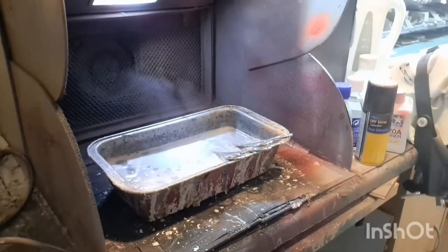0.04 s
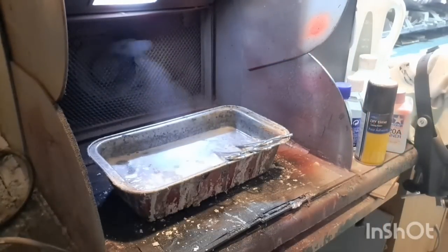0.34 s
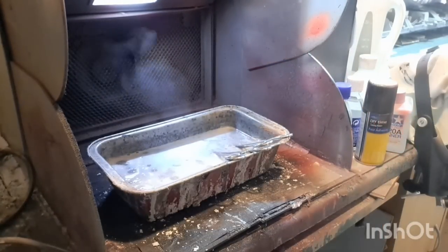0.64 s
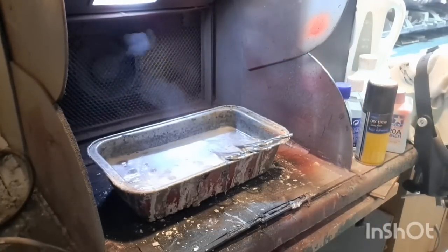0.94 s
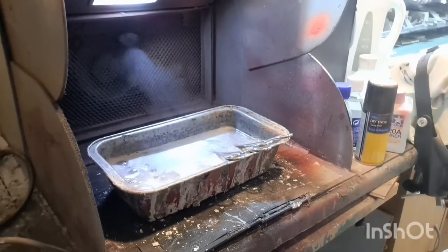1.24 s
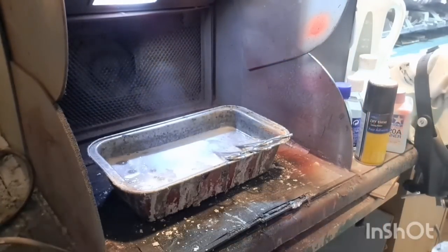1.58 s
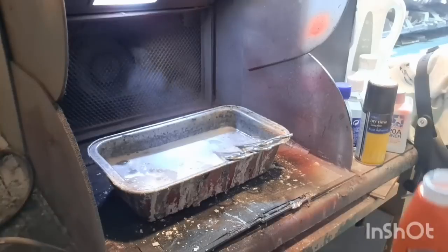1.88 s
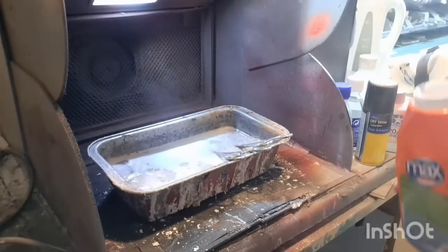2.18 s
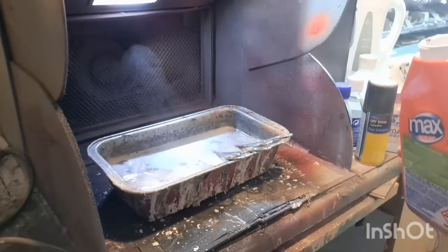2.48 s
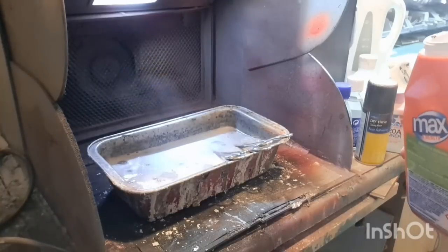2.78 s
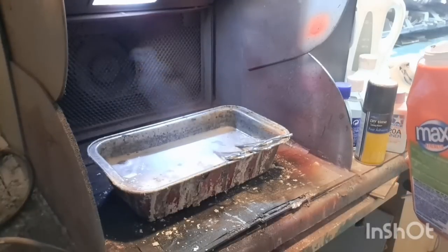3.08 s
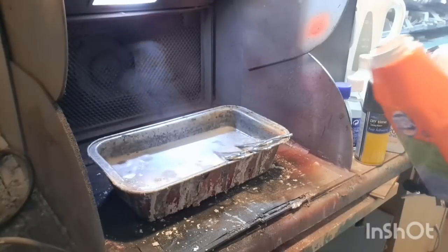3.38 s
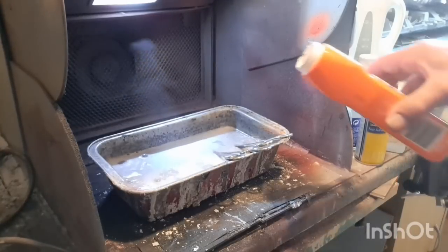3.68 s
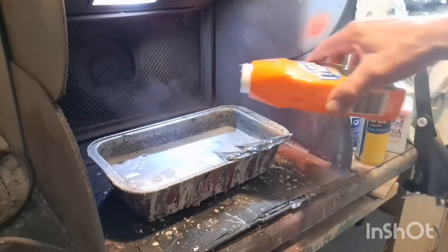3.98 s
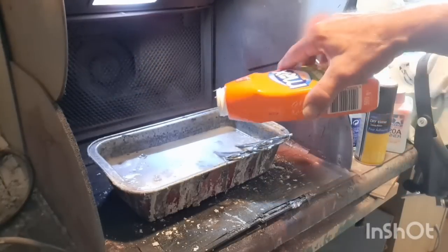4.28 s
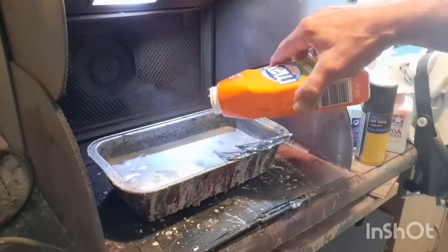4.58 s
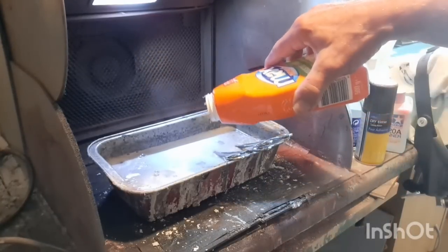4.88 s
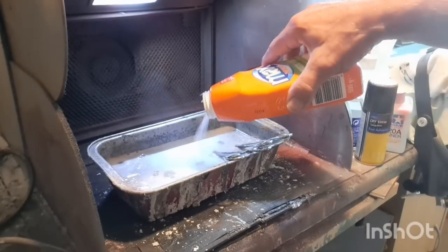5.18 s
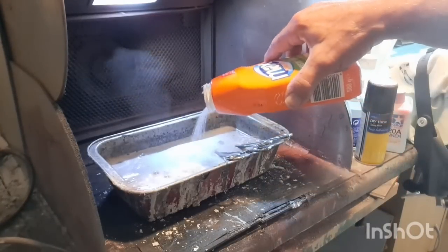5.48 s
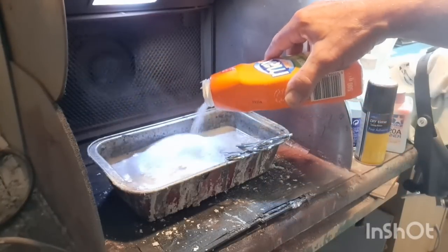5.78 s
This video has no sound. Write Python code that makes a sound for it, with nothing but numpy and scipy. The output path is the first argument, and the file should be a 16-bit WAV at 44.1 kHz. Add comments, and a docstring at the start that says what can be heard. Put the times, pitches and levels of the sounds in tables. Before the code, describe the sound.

An extractor fan runs close by in a small workshop booth for the whole six seconds. Its steady, slightly throbbing low hum rests on an even, booming rush of air. Above that are a light electric motor buzz, a fluttering hiss and a very high, thin whine. From about 2 seconds the tone shifts subtly: the whine softens a little, more on the left, and a hollow note in the airflow gradually becomes lower and stronger. At around 4.5 seconds, powder slides inside a bottle with a faint, brief, high swish. From about 5.2 seconds it trickles into a foil tray, making a soft, grainy hiss that builds until nearly 6 seconds and lasts to the end. The air's boom swells slightly around 5.5 seconds, and the fan remains the main sound throughout.

```python
"""A steady hum on a booming rush of air: the extractor fan of a small workshop booth.
Its seven-blade rotor, turning 65 times a second, radiates a harmonic series, and the turbulent flow
excites the booth's resonances. The motor buzzes at twice the mains frequency, with a fluttering hiss
and a very high whine. An arm reaches in with a bottle and screens the treble; near the end,
powder slides from the bottle and trickles softly into a foil tray."""
import sys
import numpy as np
from scipy import signal
from scipy.fft import rfft, irfft
from scipy.io import wavfile

SR = 44100
rng = np.random.default_rng(int(sys.argv[2]) if len(sys.argv) > 2 else 0)


def output_pcm(signal):
    """Save a mono or channel-first signal as 16-bit PCM at the path in sys.argv[1].

    Samples are clipped to [-1, 1] before scaling.
    """
    pcm = np.clip(np.atleast_2d(signal).T, -1, 1) * 32767
    wavfile.write(sys.argv[1], SR, np.round(pcm).astype(np.int16))


N = 266364
TIME, FREQ = np.arange(N) / SR, np.fft.rfftfreq(N, 1 / SR)
ROTOR_HZ, BUZZ_HZ, WHINE_HZ = 64.755, 100.04, 15696

# Levels precede the gains in the functions; a density is the level in a 1 Hz band. L, R: left, right.
# Coherence of the two channels: f/Hz, coherence/1
COHERENCE = [(60, 0.57), (150, 0.88), (260, 1), (400, 0.99), (520, 0.96), (700, 0.33), (1000, 0.87),
             (1800, 0.52), (2600, 0.049), (5000, 0.36), (15000, 0.057)]
# Phase lead of the left channel: f/Hz, phase/rad
PHASE_LEAD = [(60, .08), (300, -.06), (453, -.68), (600, -1.1), (830, .4), (1130, -.9), (1360, .6),
              (1600, 0), (2100, .9), (2400, 2.4), (3200, 1.2), (3800, 2.8), (6000, 3.4), (15000, 8)]
# Advance of the arm across the opening: t/s, fraction of full reach/1
ARM_REACH = [(0, 0), (2.1, .05), (3, .3), (4, .65), (5, .85), (6.04, 1.0)]
# Air rushing through the filter mesh: f/Hz, L density/dB, R density/dB
MESH_SPECTRUM = [(20, -98, -97), (45, -87, -85), (95, -90, -89), (160, -93, -94), (350, -82, -86),
                 (480, -84.5, -90), (560, -85, -85.5), (610, -88, -88), (780, -93.5, -91), (900, -91, -92),
                 (990, -91, -95), (1060, -86.5, -89.5), (1150, -91, -89.5), (1250, -92.5, -89.5),
                 (1380, -89, -89), (1480, -91.5, -93), (1650, -89.8, -88), (1900, -88.5, -86.5),
                 (2280, -92.5, -92.5), (2550, -89.5, -89.7), (2800, -91.5, -92), (3080, -95.5, -94.5),
                 (3370, -96.5, -94.5), (3600, -94, -89), (3920, -96, -91.5), (4300, -94, -90.5),
                 (4750, -94.5, -91.5), (5250, -91.7, -88.5), (6100, -94, -89.3), (7600, -92.5, -88),
                 (8850, -94, -92), (15000, -92, -90)]
# Resonances of booth and housing, driven by the air: f/Hz, width/Hz, L density/dB, R density/dB
BOOTH_MODES = [(197, 14, -73.3, -74.8), (232, 30, -73, -73), (264, 25, -63, -63.5), (299, 30, -65.3, -65.3),
               (386, 30, -73.5, -72), (660, 40, -88, -85), (1290, 110, -100, -84.5), (1395, 35, -90, -82.5),
               (3200, 50, -94, -90.5)]
# Low resonance of the duct: f/Hz, width/Hz, L density/dB, R density/dB
DUCT_MODE = [(125.8, 15, -75.5, -72.5)]
# Rise and fall of the duct's note: t/s, gain/dB
DUCT_GAIN = [(0, 2.5), (.9, 2), (1.4, -.7), (1.8, .5), (2.2, 4.5), (2.7, -1), (3.4, -2.2), (4.2, -7),
             (4.6, 2), (5.2, -3), (6.04, 4)]
# Resonances of the booth's opening: f/Hz, width/Hz, L density/dB, R density/dB
OPENING_MODES = [(720, 53, -96, -79.5), (765, 136, -104, -88)]
# Powder sliding in the bottle: f/Hz, width/Hz, L density/dB, R density/dB
SLIDE_BANDS = [(8300, 600, -92, -84), (9300, 600, -94, -89)]
# Grains landing in the tray: f/Hz, L relative level/dB, R relative level/dB
GRAIN_SPECTRUM = [(300, -12, -12), (600, -2, -2), (880, 1, 2), (1300, 2, 1), (1750, 1, 6), (2410, 0, 2),
                  (3300, -13, -13), (4100, 0, 0.5), (6000, -6, -2), (9000, -9, -4), (15000, -19, -15)]
# Envelope of the buzz's rasping upper bands: f/Hz, L level/dB, R level/dB
RASP_SPECTRUM = [(5900, -100, -100), (8140, -82, -81), (10400, -85, -74), (12460, -68, -62),
                 (14900, -59, -55), (15500, -58, -47)]
# Hiss of the motor: f/Hz, L relative level/dB, R relative level/dB
HISS_SPECTRUM = [(6450, -25, -19.5), (8850, -14, -16), (9450, -9.5, -10.5), (11300, -5.5, -5),
                 (12800, 1.5, 3), (14400, -1, -4), (16300, 2, 5)]
# Screening of the hiss by hand and bottle: t/s, relative level/dB
HISS_SCREENING = [(0, 0), (0.5, -0.6), (1, 0.5), (1.35, 0), (1.6, -1.5), (2.1, 0.4), (2.8, -1), (3.7, -2),
                  (4.2, -1), (4.5, 0.0), (4.8, -0.2), (5.2, -1), (6.04, 0.8)]
# High resonances of the motor's shell: f/Hz, width/Hz, L density/dB, R density/dB
SHELL_MODES = [(9804.0, 46.3, -94.0, -82.0), (10510.1, 120.8, -87.1, -83.8), (10896.0, 42.3, -87.7, -79.6),
               (11427.4, 91.8, -93.3, -75.3), (11557.0, 46.7, -77.8, -84.6), (12007.0, 94.9, -78.2, -73.0),
               (12501.5, 118.7, -76.7, -76.8), (12634.8, 88.9, -79.3, -77.5),
               (13010.6, 124.9, -79.9, -69.3), (13279.9, 105.0, -78.0, -74.3),
               (13591.0, 129.2, -78.2, -70.0), (13903.2, 100.0, -77.5, -73.4),
               (14088.0, 81.8, -85.9, -69.0), (14238.6, 102.6, -73.6, -71.0),
               (14582.9, 118.0, -79.8, -69.6), (14848.9, 167.1, -75.1, -68.2)]
# Housing resonances, driven by the hiss: f/Hz, width/Hz, L density/dB, R density/dB, full-reach gain/dB
HOUSING_MODES = [(6745, 130, -86, -89, -2), (7410, 174, -87.5, -86, -3), (7670, 110, -83.5, -76, -6),
                 (7907, 129, -97, -82.5, -3), (8389, 204, -85, -80.5, -.5)]
# Envelope of the weak buzz harmonics: f/Hz, L level/dB, R level/dB
BUZZ_ENVELOPE = [(200, -98, -94), (1800, -90, -86), (3000, -120, -98), (6300, -78, -85), (7140, -84, -74),
                 (8050, -92, -84), (9400, -106, -88), (10700, -93, -90)]
# Strong harmonics of the magnetic buzz: harmonic number, L level/dB, R level/dB
BUZZ_HARMONICS = [(14, -82, -76), (22, -77, -75), (27, -87, -74), (29, -73, -72), (31, -82, -77),
                  (32, -68, -64), (33, -80, -75), (35, -80, -71), (37, -80, -72), (43, -78, -69),
                  (46, -79, -73), (52, -85, -70), (53, -74, -71), (55, -80, -71), (62, -83, -69),
                  (63, -78, -69), (67, -76, -71), (68, -76, -73), (69, -76, -72), (73, -78, -72),
                  (77, -75, -66), (78, -86, -70), (79, -78, -70), (84, -77, -70), (85, -77, -72)]
# Sidebands of the whine: f/Hz, width/Hz, L density/dB, R density/dB
WHINE_SIDEBANDS = [(15650, 45, -70, -53), (15580, 80, -66.5, -59.5), (15505, 35, -62, -63),
                   (15398, 30, -64, -64), (15320, 55, -75, -64)]
# Envelope of the weak rotor harmonics: f/Hz, L level/dB, R level/dB
ROTOR_ENVELOPE = [(130, -85, -84), (800, -88, -87), (1500, -87, -83), (2150, -85, -81), (2450, -75, -77),
                  (3200, -81, -80), (4400, -83, -78), (5250, -78, -78.5), (6000, -89, -85),
                  (6800, -82, -80), (9000, -93, -89)]
# Strong rotor harmonics, every seventh from blade passage: harmonic number, L level/dB, R level/dB
ROTOR_HARMONICS = [(1, -50, -48), (2, -73, -67), (3, -70, -70), (6, -68, -68), (7, -49.5, -53),
                   (8, -58.5, -60.5), (9, -74, -84), (12, -81, -71), (13, -84, -76), (20, -79, -71),
                   (21, -62.3, -54.2), (25, -75, -69), (26, -80, -71), (28, -68, -66), (33, -76, -73),
                   (34, -75, -72), (36, -74, -72), (39, -74, -77), (40, -69, -71), (42, -69, -77),
                   (49, -80, -74), (54, -81, -72), (55, -80, -69), (56, -75, -71), (58, -81, -72),
                   (63, -74, -67), (64, -88, -73), (65, -80, -70), (70, -80, -67.5), (72, -78, -74),
                   (77, -72, -66), (79, -73, -72), (80, -73, -70), (81, -73, -72), (85, -81, -71)]
# Rotor harmonics altered by the arm:
# harmonic number, L level/dB, R level/dB, L full-reach gain/dB, R full-reach gain/dB, rms throb/dB
ARM_HARMONICS = [(4, -48, -48.5, 1.8, 1.8, 1.0), (14, -61, -65, -11, -1.5, .5)]


def from_db(db):
    """Amplitude ratio of a level difference."""
    return 10 ** (np.asarray(db) / 20)


def stereo(left, right):
    """A column with one value per channel."""
    return np.array([[left], [right]])


def unit_rms(x):
    """Normalisation to unit mean square."""
    return x / np.sqrt(np.mean(x ** 2) + 1e-30)


def in_time(rows):
    """Linear interpolation of a curve at every sample."""
    return np.interp(TIME, *np.transpose(rows))


def at_hz(rows, hz):
    """Interpolation of each column of a spectrum in log frequency."""
    points, *columns = np.transpose(rows)
    return np.array([np.interp(np.log(hz + 1e-9), np.log(points), c) for c in columns])


def bump(centre_s, width_s):
    """A Gaussian pulse of unit height."""
    return np.exp(-((TIME - centre_s) / width_s) ** 2)


def drift(corner_hz, size=8192):
    """A random fluctuation: low-pass noise of unit rms."""
    seconds = N / SR
    low_pass = 1 / (1 + (np.fft.rfftfreq(size, seconds / size) / corner_hz) ** 2)
    slow = irfft(rfft(rng.standard_normal(size)) * low_pass, size)
    return np.interp(TIME, np.linspace(0, seconds, size), unit_rms(slow))


def resonances(modes):
    """Amplitude response of steep-sided resonances that add in power."""
    power = sum(from_db(stereo(left, right)) ** 2 / (1 + ((FREQ - hz) / (0.7 * width)) ** 2) ** 2
                for hz, width, left, right in modes)
    return np.sqrt(power)


def noise(gain):
    """Partially coherent stereo noise: alike in the bass, nearly independent in the treble."""
    shared, own = rfft(rng.standard_normal((2, N))) * np.sqrt(SR / 2)
    coherence = np.clip(at_hz(COHERENCE, FREQ)[0], 0, 1)
    left = coherence * shared + np.sqrt(1 - coherence ** 2) * own
    left *= np.exp(1j * at_hz(PHASE_LEAD, FREQ)[0])
    return irfft(np.array([left, shared]) * gain, N)


def harmonic_series(base_hz, slip_s, envelope, strong, scatter_db, size=8192):
    """Fourier synthesis of one cycle, repeated with timing jitter; strong harmonics top a weak bed."""
    hz = np.arange(1, int(envelope[-1][0] / base_hz) + 1) * base_hz
    chance = rng.standard_normal((size // 2, 4))[:len(hz)].T
    level_db = at_hz(envelope, hz) + scatter_db * chance[:2]
    # Weak, short waves reach each side by different reflections; strong tones come more directly.
    direct_lead = np.clip(at_hz(PHASE_LEAD, hz)[0], -1.5, 1.5)
    lead = direct_lead + np.pi * chance[2] * np.clip(hz / 1800 - 1, 0, 1)
    for number, left, right in strong:
        k = round(number) - 1
        level_db[:, k], lead[k] = (left, right), direct_lead[k]
    phase = 2 * np.pi * chance[3] + np.array([lead, np.zeros_like(lead)])
    partials = np.pad(from_db(level_db) * np.exp(1j * phase), ((0, 0), (1, 0)))
    cycle = irfft(partials, size) * size / np.sqrt(2)
    turns = base_hz * (TIME + slip_s)
    return np.array([np.interp(turns, np.arange(size) / size, side, period=1) for side in cycle])


def wall_ripple(strength, count=8):
    """Interference with early wall reflections ripples the treble, differently on each side."""
    delay_s = rng.uniform(0.001, 0.012, (count, 2, 1))
    echoes = np.exp(-2j * np.pi * FREQ * delay_s).sum(0) / np.sqrt(count)
    share = strength * np.clip(FREQ / 8000, 0, 1) ** 2
    return np.abs(1 + share * echoes) / np.sqrt(1 + share ** 2)


def treble_flicker(x, depth_db, count=12):
    """Independent amplitude modulation of overlapping bands makes the treble flicker."""
    centres_hz = np.geomspace(1800, 12000, count)
    spectrum, flickered = rfft(x), x.copy()
    for weights in np.eye(count)[1:-1]:
        band = irfft(spectrum * np.interp(FREQ, centres_hz, weights), N)
        flickered += band * (from_db(depth_db * drift(18)) - 1)
    return flickered


def opening_note(reach, full_sag_hz=47.9, rise_db=7.5):
    """The opening resonates with a hollow note, lower and stronger as the arm narrows it."""
    sag_hz = full_sag_hz * np.clip(reach / 0.55, 0, 1)
    analytic = signal.hilbert(noise(resonances(OPENING_MODES)))
    lowered = analytic * np.exp(-2j * np.pi * np.cumsum(sag_hz) / SR)
    return lowered.real * from_db(rise_db * reach)


def airflow(reach):
    """Turbulence gives a broadband rush and drives the resonances of booth, duct and opening."""
    rush = noise(from_db(at_hz(MESH_SPECTRUM, FREQ)) * wall_ripple(strength=1.0))
    boom_db = 0.22 - 1.0 * reach + 0.64 * drift(1)
    swell_db = 3 * bump(centre_s=5.45, width_s=0.18)
    boom = noise(resonances(BOOTH_MODES)) * from_db(boom_db + swell_db)
    duct = noise(resonances(DUCT_MODE)) * from_db(in_time(DUCT_GAIN))
    return rush + boom + duct + opening_note(reach)


def powder(pour_s=5.24, rise_s=0.62, pour_db=-51.7):
    """Powder slides down the bottle; countless impacts in the tray then add incoherently to a hiss."""
    slide = noise(resonances(SLIDE_BANDS)) * bump(centre_s=4.56, width_s=0.3)
    grains = unit_rms(noise(from_db(at_hz(GRAIN_SPECTRUM, FREQ))))
    flow = np.clip((TIME - pour_s) / rise_s, 0, 1)
    flicker = from_db(1.8 * drift(60))
    return (slide + grains * flow * from_db(pour_db)) * flicker


def rasp(half_width_hz=16):
    """A comb of narrow noise bands, one buzz frequency apart, spreads downwards from the whine."""
    offset_hz = ((FREQ - WHINE_HZ) / BUZZ_HZ + 0.5) % 1 * BUZZ_HZ - BUZZ_HZ / 2
    comb = unit_rms(1 / (1 + (offset_hz / half_width_hz) ** 2)) / np.sqrt(BUZZ_HZ)
    return noise(from_db(at_hz(RASP_SPECTRUM, FREQ)) * comb * wall_ripple(strength=0.4))


def housing_ring(reach):
    """The housing's modes ring in forced vibration; the arm screens them unequally."""
    return sum(noise(resonances([mode])) * from_db(change_db * reach)
               for *mode, change_db in HOUSING_MODES)


def motor(reach):
    """Magnetic force buzzes twice per mains cycle; the motor's noise fades in the hand's shadow."""
    buzz = harmonic_series(BUZZ_HZ, 6e-6 * drift(14), BUZZ_ENVELOPE, BUZZ_HARMONICS, scatter_db=7.0)
    broadband = from_db(at_hz(HISS_SPECTRUM, FREQ) - 78.5) * wall_ripple(strength=0.4)
    hiss = noise(np.hypot(broadband, resonances(SHELL_MODES)))
    buzz_phase = 2 * np.pi * BUZZ_HZ * TIME
    pulsing = 1 - 0.047 * np.cos(buzz_phase) + 0.05 * np.sin(2 * buzz_phase)
    swing_db = in_time(HISS_SCREENING) - in_time(HISS_SCREENING).mean()
    housing = housing_ring(reach) * from_db(2.2 * swing_db)
    rasping_hiss = (rasp() + hiss) * pulsing * from_db(swing_db)
    gain_db = stereo(-1, -1.3) - stereo(2.5, 0) * reach  # the arm shades the left side
    flutter_db = 0.39 * drift(19)
    return buzz + (rasping_hiss + housing) * from_db(gain_db + flutter_db)


def whine(reach):
    """A thin tone with sidebands wavers in frequency and dips each mains half cycle; the arm shades it."""
    pitch_hz = WHINE_HZ + 20 * drift(45)
    phase = 2 * np.pi * np.cumsum(pitch_hz) / SR + stereo(1.9, 0)
    tone = np.sqrt(2) * from_db(stereo(-37, -31)) * np.sin(phase)
    sidebands = noise(resonances(WHINE_SIDEBANDS))
    dip_db = 4.9 * (0.5 + 0.5 * np.cos(2 * np.pi * BUZZ_HZ * TIME)) ** 8
    arm_loss_db = stereo(4, 1) * reach
    bottle_loss_db = 4 * bump(centre_s=2.7, width_s=0.55)
    flutter_db = drift(70)
    return (tone + sidebands) * from_db(-1.5 - arm_loss_db - bottle_loss_db - dip_db + flutter_db)


def rotor(reach, throb_hz=4.6):
    """Periodic forcing: imbalance acts once a turn, the blades seven times; eddies unsettle both."""
    slip_s = 1e-5 * drift(1) + 4e-6 * drift(25)
    tones = harmonic_series(ROTOR_HZ, slip_s, ROTOR_ENVELOPE, ROTOR_HARMONICS, scatter_db=-4.0)
    # As the arm reaches in, the throbbing drone grows and the octave of the blade tone fades.
    for number, left, right, left_change, right_change, throb_db in ARM_HARMONICS:
        level_db = stereo(left, right) + stereo(left_change, right_change) * reach
        tone = np.sqrt(2) * np.sin(2 * np.pi * number * ROTOR_HZ * (TIME + slip_s))
        tones += tone * from_db(level_db + throb_db * drift(throb_hz))
    return tones * from_db(0.3 * drift(6))


def scene():
    """Superposition of the fan at the back of the booth and the powder in front of it."""
    reach = in_time(ARM_REACH)
    fan = rotor(reach) + airflow(reach) + motor(reach)
    return treble_flicker(fan, depth_db=1.26) + whine(reach) + powder()


def record(dry):
    """A steep low-pass filter removes the highest treble."""
    cutoff_hz, slope_db_per_hz, floor_db = 15745, 0.5, -90
    gain_db = np.clip((cutoff_hz - FREQ) * slope_db_per_hz, floor_db, 0)
    return irfft(rfft(dry) * from_db(gain_db), N)


dry = scene()
out = record(dry)
output_pcm(out)
```